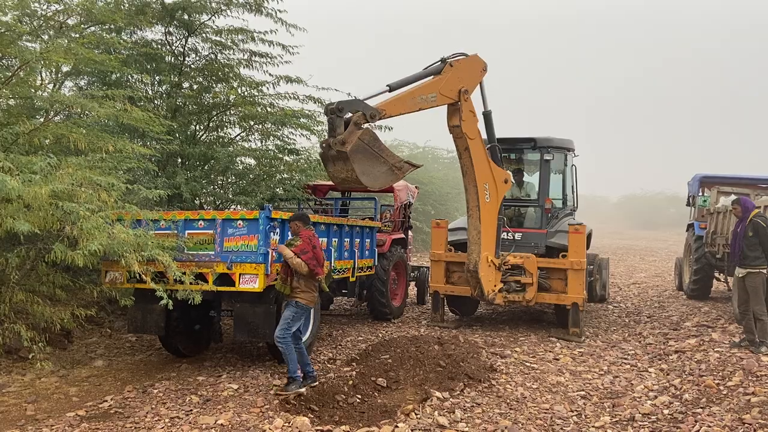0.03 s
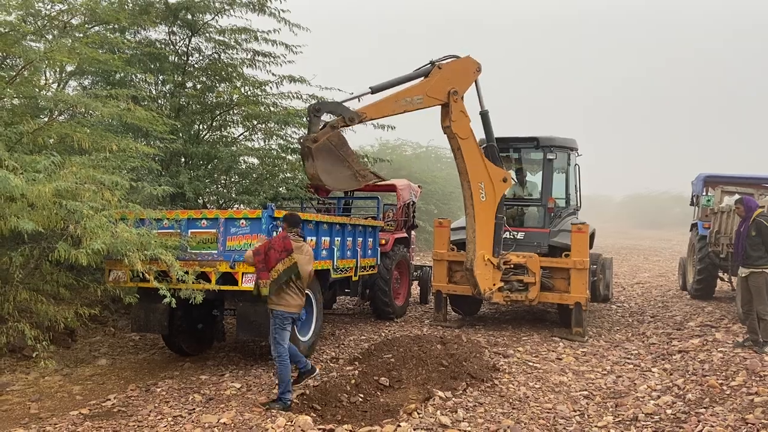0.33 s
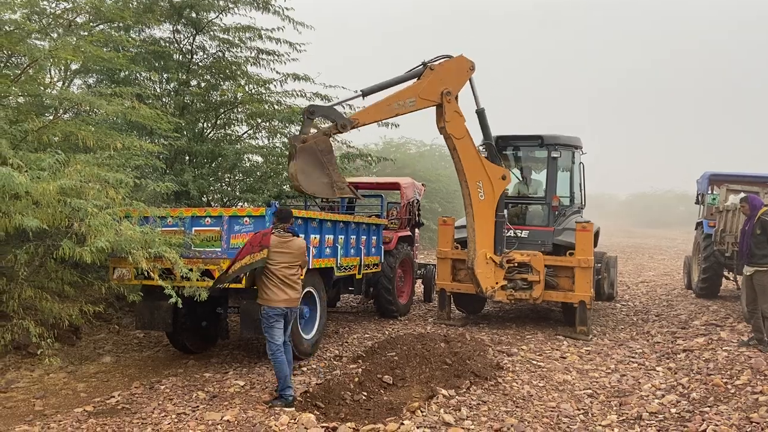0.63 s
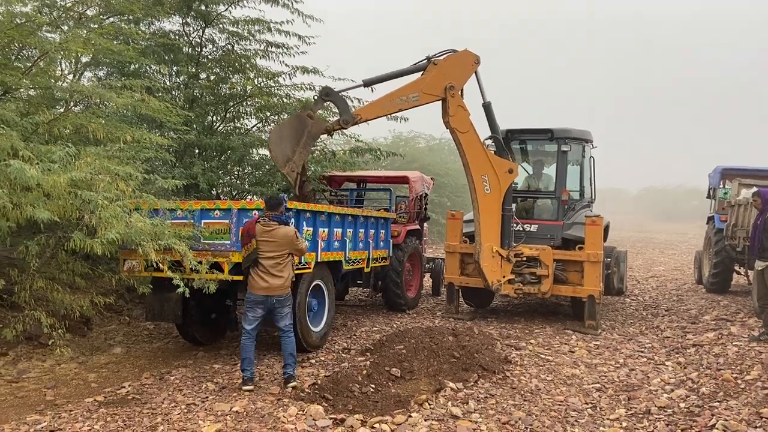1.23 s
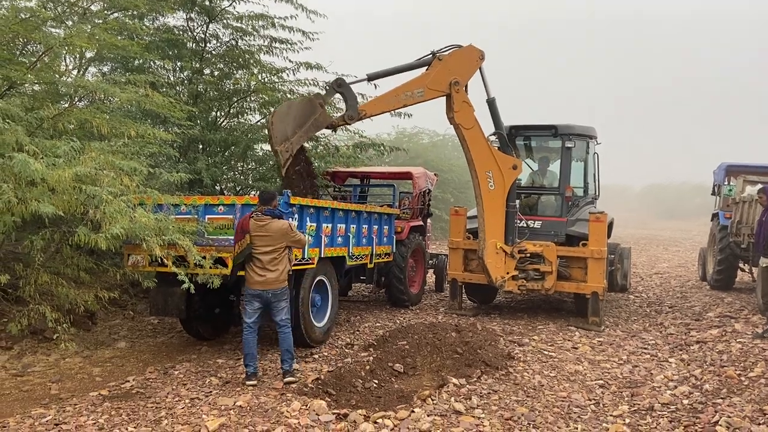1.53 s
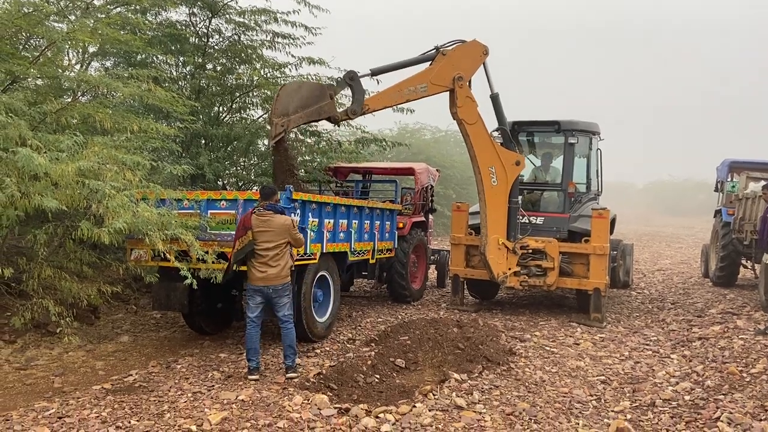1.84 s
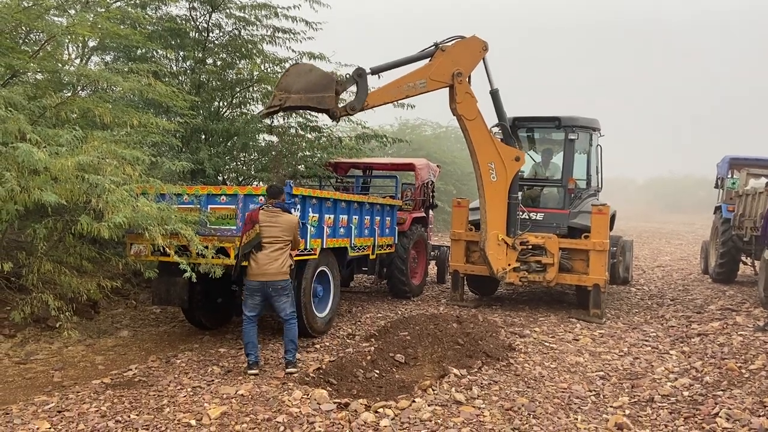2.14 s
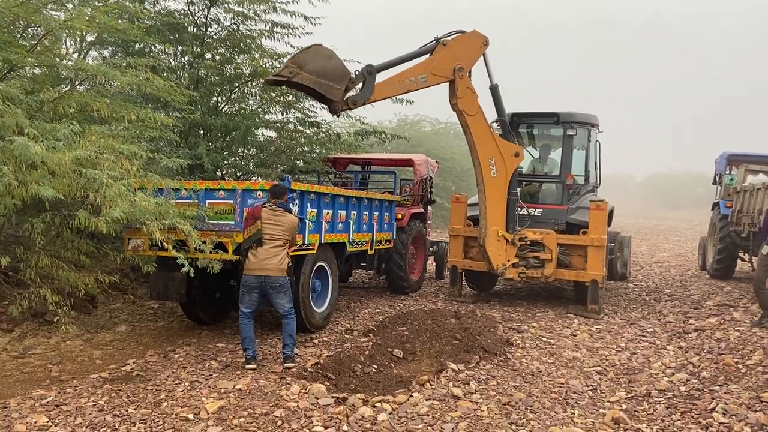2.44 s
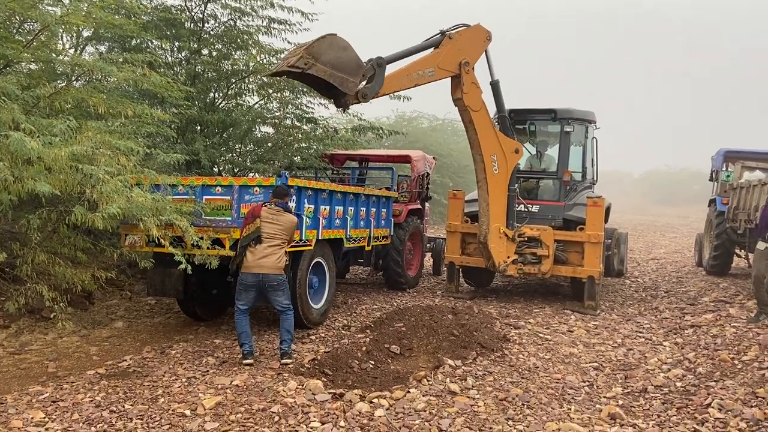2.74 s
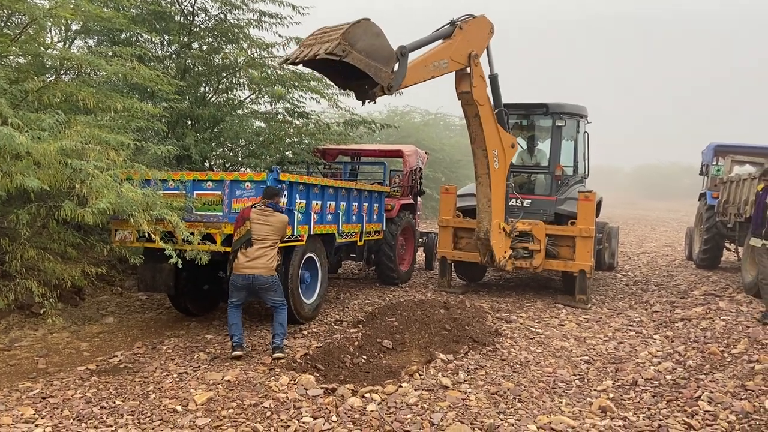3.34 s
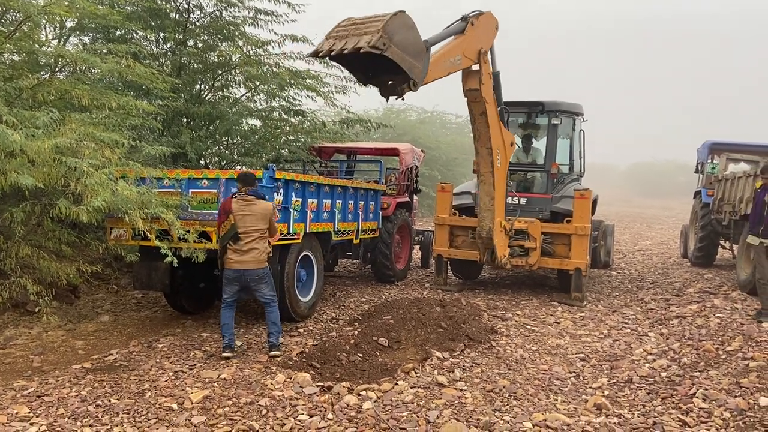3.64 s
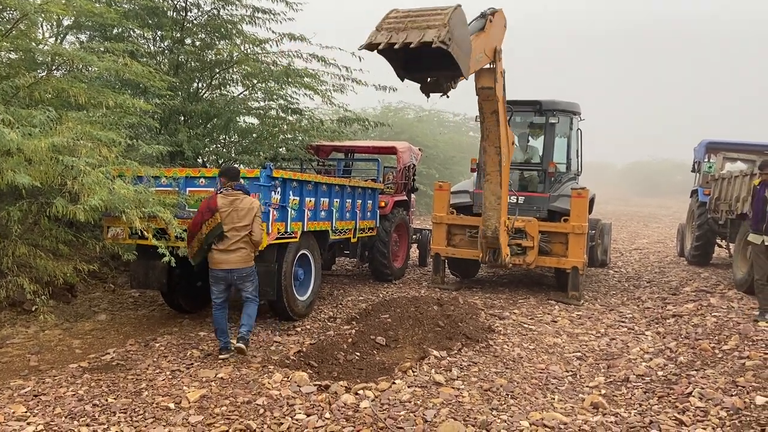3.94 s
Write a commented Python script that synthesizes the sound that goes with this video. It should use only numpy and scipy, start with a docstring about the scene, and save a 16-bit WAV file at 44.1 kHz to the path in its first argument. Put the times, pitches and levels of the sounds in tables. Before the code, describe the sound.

A load of stones and sliding earth clatters onto a ringing metal trailer bed outdoors. Some metres from the microphone, a backhoe rumbles throughout; its boom clunks, the load drops, then the boom knocks again and a little grit ticks.

```python
"""A diesel drones, with fan, pump whine and oil hiss: a backhoe at work some metres off on open ground.
Its boom clunks in slack pins, then the bucket tips soil and stones into a steel trailer. Clumps of
stones crash on the ringing bed in two waves over a stream of sliding earth, and heavy soil thumps the
chassis. The drone sinks in level during the crash, then comes back. A few stragglers drop, the boom
clunks again and grit ticks."""
import sys
import numpy as np
from scipy import signal
from scipy.fft import rfft, irfft, next_fast_len
from scipy.io import wavfile
from scipy.ndimage import map_coordinates

SR = 44100
rng = np.random.default_rng(int(sys.argv[2]) if len(sys.argv) > 2 else 0)


def store_wav(level_fs):
    """Save 16-bit WAV to argv[1]."""
    pcm = np.round(np.clip(np.atleast_2d(level_fs), -1, 1) * 32767)
    wavfile.write(sys.argv[1], SR, pcm.T.astype(np.int16))


N = 176400

# Levels are relative within a layer; a colour is the spectrum of a noise.
# the diesel's firing rate (t/s, f/Hz)
FIRING_RATE = [(0.1, 45.4), (.38, 46.2), (.52, 49), (.68, 46), (.82, 47), (.98, 45.6), (1.2, 44.8),
               (1.6, 45.7), (2.22, 43), (2.53, 45.8), (2.76, 44), (2.98, 45.7), (3.25, 46.9), (4, 47.6)]
# level of the drone, which sinks during the crash and comes back (t/s, level/dB)
DRONE_LEVEL = [(.1, 1), (.55, 1.5), (1.03, 1), (1.25, -10.5), (1.5, -7), (1.78, -2), (2.2, -3.5),
               (2.65, -1.5), (2.85, 0), (3.3, 0), (4, -0.5)]
# exhaust hum and pump whine (multiple of the firing rate, level/dB)
EXHAUST_TONES = [(1, -31), (1.5, -48.5), (2, -27), (2.5, -53.5), (4, -37.5), (5, -36)]
PUMP_TONES = [(15, -44), (20, -45.5), (26, -53.5), (30, -54.5)]
# dark engine rumble and hard midrange clatter (f/Hz, level/dB)
RUMBLE_COLOUR = [(25, -40), (45, 1), (70, -9.5), (130, 0.5), (200, -0.5), (300, -3), (400, -8.5),
                 (520, -15), (1000, -30), (3000, -80)]
CLATTER_COLOUR = [(200, -24), (480, -1), (650, 4.5), (950, 0.5), (1300, -6.5), (2000, -6.5), (2800, -16.5),
                  (4200, -18.5), (5500, -30.5), (8000, -44), (15000, -48)]
# oil hiss in the valves: its swells (t/s, level/dB) and its colour (f/Hz, level/dB)
HISS_LEVEL = [(.1, -58), (.27, -46), (.42, -45), (.6, -52.5), (1, -59), (2.2, -45), (2.52, -55),
              (2.63, -41), (2.95, -43), (3.4, -45), (4, -44.5)]
HISS_COLOUR = [(1500, -27), (4000, -0.5), (6200, -2), (7700, 2.5), (9500, 0.5), (11500, 2), (15500, -2.5)]
# clunks of boom and bucket (t/s, thud level/dB, knock level/dB, clink level/dB)
CLUNK_HITS = [(0.179, -27.5, -27.5, -61.5), (0.233, -13.5, -27, -44), (0.294, -33, -28.5, -51),
              (.562, -25.5, -24, -31), (.622, -26.5, -30, -58), (0.742, -27, -29, -40.5),
              (.762, -25.5, -48, -59), (0.808, -25, -23.5, -38.5), (.86, -31, -33, -42.5),
              (2.558, -32, -30, -36.5), (2.694, -25, -24.5, -38), (2.73, -42, -33, -42.5),
              (2.766, -43, -28.5, -44), (2.805, -24, -33, -53), (2.878, -17.5, -26.5, -52),
              (2.904, -24, -31, -43), (2.987, -24.5, -23, -35)]
# low, middle and top of a clunk (f/Hz, level/dB)
THUD_COLOUR = [(100, -21), (220, -0.5), (300, -1), (380, -5.5), (520, -13.5), (1200, -51)]
KNOCK_COLOUR = [(250, -16), (500, -5), (800, 6.5), (1050, -1), (1400, -7), (1900, -9), (2600, -24.5),
                (6000, -43)]
CLINK_COLOUR = [(1200, -25), (2100, -3), (2600, -2), (3600, -0.5), (4600, -11), (7000, -15), (15000, -35)]
# ring of the bucket and its linkage (f/Hz, level/dB, t60/s)
LINKAGE_MODES = [(320.6, -3.5, 0.12), (1714, -6, 0.22), (2435, 3, 0.059), (2546, -12, 0.16),
                 (2773, 3.5, 0.042), (3120, -5, 0.097), (3764, -1, 0.063)]
# stream of earth (t/s, bass level/dB, middle level/dB, treble level/dB)
EARTH_LEVELS = [(1.03, -49, -56, -49), (1.07, -50, -27, -27), (1.2, -24.5, -23.5, -30.5),
                (1.35, -26.5, -25.5, -38.5), (1.5, -22, -27, -36), (1.67, -31.5, -34.5, -41),
                (1.77, -31, -27, -32.5), (1.95, -27, -29, -34.5), (2.04, -24.5, -24.5, -34),
                (2.161, -33.5, -35, -43.5), (2.32, -46, -41, -43.5), (2.45, -63, -63, -68)]
# clumps of stones on the bed (t/s, clang level/dB, body level/dB, crack level/dB, spray level/dB)
STONE_HITS = [(1.042, -14, -24.5, -19, -18), (1.062, -15.5, -23, -23, -21), (1.11, -10.5, -22, -14, -19),
              (1.149, -16.5, -24, -19, -28), (1.186, -10.5, -22, -17.5, -29), (1.226, -28, -25, -25, -30),
              (1.263, -15, -22.5, -16.5, -34), (1.313, -18.5, -12.5, -32, -42),
              (1.382, -29, -19.5, -28.5, -40), (1.402, -30, -20.5, -25.5, -28.5),
              (1.463, -41, -29, -36, -40), (1.553, -22.5, -20.5, -30, -36), (1.579, -17.5, -35, -28.5, -42),
              (1.612, -35, -22.5, -33, -48), (1.725, -32, -35, -29.5, -30), (1.797, -12, -15.5, -21.5, -31),
              (1.819, -19.5, -33, -34, -31), (1.884, -17, -16, -27.5, -40), (1.931, -23, -27, -38, -25.5),
              (1.96, -21.5, -21, -42, -32), (1.993, -16.5, -15, -39, -16), (2.062, -21.5, -22.5, -21, -20),
              (2.219, -37, -44, -30.5, -24.5), (2.335, -38, -50, -33, -37), (2.446, -48, -52, -34, -35)]
# the falling load: booming body, steely clang, sharp crack, spray of fine gravel (f/Hz, level/dB)
BODY_COLOUR = [(60, -13), (120, -13), (220, 0), (315, 2.5), (430, -4.5), (620, -12), (1500, -41.5)]
CLANG_COLOUR = [(200, -15), (480, -6), (680, -0.5), (830, 3.5), (1100, -3.5), (1400, -6), (1700, -5),
                (2000, -10), (2500, -9.5), (3800, -15.5), (6000, -33.5), (15000, -44)]
CRACK_COLOUR = [(800, -28), (1900, -4), (2600, 1), (3900, 3.5), (5200, -1), (7000, -12), (9500, -7),
                (15500, -27)]
SPRAY_COLOUR = [(2000, -21), (4000, -1.5), (5800, 0), (7600, -1.5), (9500, -3), (12000, -8.5),
                (15500, -13.5)]
# ring of the steel bed (f/Hz, level/dB, t60/s)
BED_MODES = [(308, -2, 0.47), (442, -10, 0.27), (560.5, 1, 0.31), (626, -18, 0.53), (732, -17, 0.53),
             (821, 1.5, 0.4), (1136, 3.5, 0.16), (1290, -22, 0.3), (1730, -5, 0.27), (2100, 0.5, 0.14),
             (2330, 2.5, 0.11), (2410, 1, 0.18), (3150, 2.5, 0.083), (3828, -1, 0.17)]
# the bulk of the soil landing (t/s, level/dB) and its deep colour (f/Hz, level/dB)
SLUMP_HITS = [(1.585, -22), (1.8, -23), (1.89, -25)]
SLUMP_COLOUR = [(35, -25), (65, 0), (140, 1.5), (200, -2), (400, -37.5)]
# grit ticking nearby (t/s, level/dB) and its bright colour (f/Hz, level/dB)
GRIT_HITS = [(3.29, -34), (3.638, -36), (3.677, -38), (3.852, -37.5)]
GRIT_COLOUR = [(2000, -6), (5000, -3.5), (11000, 0), (15500, -4)]
# stereo width (f/Hz, side over mid level/dB) and lean (f/Hz, left over right level/dB)
STEREO_WIDTH = [(60, -20), (250, -17), (500, -13), (1100, -8.5), (2200, -6), (4200, -7.5), (5500, 1.5),
                (6600, -33), (14000, -33)]
STEREO_LEAN = [(60, -0.5), (330, -1.5), (700, 0.7), (3500, 2.5), (9000, 0)]


def amp(db):
    """Decibels to gain."""
    return 10 ** (np.asarray(db) / 20)


def along(points, hz):
    """Read (f/Hz, value) points at hz, on a log frequency axis."""
    freqs, values = np.transpose(points)
    return np.interp(np.log(hz + 1), np.log(freqs + 1), values)


def curves(rows):
    """One value per sample for each column after the time."""
    times, *columns = np.transpose(rows)
    return [np.interp(np.arange(N) / SR, times, column) for column in columns]


def wobble(per_s):
    """A smooth random curve with per_s knots a second."""
    knots = rng.standard_normal(int(N * per_s / SR) + 4)
    return map_coordinates(knots, [np.arange(N) * per_s / SR])


def filtered(x, response):
    """Equalise x with a gain given as a function of frequency."""
    size = next_fast_len(N + SR // 2)
    return irfft(rfft(x, size) * response(np.fft.rfftfreq(size, 1 / SR)), size)[..., :N]


def texture(colour, grains=1):
    """Coloured mid and side noise, mid at rms 1; sparse grains make it gritty."""
    def response(hz):
        return amp(along(colour, hz)) * np.array([np.ones_like(hz), amp(along(STEREO_WIDTH, hz))])
    pair = filtered(grains * rng.standard_normal((2, N)), response)
    return pair / np.std(pair[0])


def contacts(per_s, spread_db):
    """Random tiny contacts of uneven size."""
    return (rng.random(N) < per_s / SR) * amp(spread_db * np.clip(rng.standard_normal(N), -2, 2))


def bursts(times, levels_db, rise_s, fall_db_per_s):
    """Envelope of hits with a quick attack and a steady decay; overlaps add in power."""
    age = np.arange(SR // 2) / SR
    shape = np.minimum(age / rise_s, 1) * amp(-fall_db_per_s * np.maximum(age - rise_s, 0))
    power = np.zeros(N + SR)
    for start_s, db in zip(times, levels_db):
        power[round(start_s * SR):][:len(age)] += (amp(db) * shape) ** 2
    return np.sqrt(power[:N])


def ring(x, modes):
    """Send x through decaying modes, with a response of unit energy."""
    age = np.arange(SR // 2) / SR
    response = sum(amp(db - 60 * age / t60) / np.sqrt(t60) * np.cos(2 * np.pi * hz * age)
                   for hz, db, t60 in modes)
    return signal.fftconvolve(x, response[None] / np.linalg.norm(response), axes=1)[:, :N]


def diesel(fan_multiple=3.553):
    """Exhaust, fan and pump follow one shaft; rumble and clatter pulse with the firings."""
    firing_hz, = curves(FIRING_RATE)
    drone_db, = curves(DRONE_LEVEL)
    firing_phase = 2 * np.pi * np.cumsum(firing_hz) / SR

    def tone(multiple, db, flutter_db, drift_rad):
        gain = np.sqrt(2) * amp(db + flutter_db * wobble(16))
        phase = multiple * firing_phase + drift_rad * wobble(12) + rng.uniform(0, 2 * np.pi)
        return gain * np.sin(phase)

    exhaust = sum(tone(k, db, flutter_db=0.45, drift_rad=0.021) for k, db in EXHAUST_TONES)
    fan = tone(fan_multiple, db=-26.5, flutter_db=1.64, drift_rad=0.11)
    pump = sum(tone(k, db, flutter_db=1.5, drift_rad=0.22) for k, db in PUMP_TONES)
    tones = np.array([exhaust + fan + pump, np.zeros(N)])  # all mid, no side
    rumble = amp(-31.5 + 0.4 * wobble(5.9)) * texture(RUMBLE_COLOUR)
    rumble *= 1 + 0.44 * np.cos(firing_phase)
    clatter = amp(-37.5 + 0.8 * wobble(6.75)) * texture(CLATTER_COLOUR)
    clatter *= 1 + 0.083 * np.cos(firing_phase) + 0.071 * np.cos(firing_phase / 2)
    return amp(drone_db) * (tones + rumble + clatter)


def oil_hiss():
    """Oil hisses as the valves open."""
    level_db, = curves(HISS_LEVEL)
    return amp(level_db) * texture(HISS_COLOUR)


def boom_clunks():
    """Slack pins knock as the arm changes direction, and the linkage rings briefly."""
    times, *levels = np.transpose(CLUNK_HITS)
    knocks = sum(bursts(times, db, rise_s=0.0064, fall_db_per_s=300) * texture(colour)
                 for db, colour in zip(levels, (THUD_COLOUR, KNOCK_COLOUR, CLINK_COLOUR)))
    return amp(-2.5) * (knocks + amp(-12) * ring(knocks, LINKAGE_MODES))


def sliding_earth():
    """Earth pours as a stream of fine contacts, in three flickering bands."""
    bands = zip(curves(EARTH_LEVELS), (BODY_COLOUR, CLANG_COLOUR, SPRAY_COLOUR))
    return sum(amp(db + 1.17 * wobble(70)) * texture(colour, contacts(per_s=4000, spread_db=0.5))
               for db, colour in bands)


def stone_crashes():
    """Stones land in clumps of many contacts and throw up gravel; the low body dies away last."""
    times, clang_db, body_db, crack_db, spray_db = np.transpose(STONE_HITS)
    clang_env, crack_env, spray_env = (bursts(times, db, rise_s=0.008, fall_db_per_s=294)
                                       for db in (clang_db, crack_db, spray_db))
    clang = clang_env * texture(CLANG_COLOUR, contacts(per_s=5000, spread_db=1))
    body = bursts(times, body_db, rise_s=0.008, fall_db_per_s=175) * texture(BODY_COLOUR)
    crack = crack_env * texture(CRACK_COLOUR, contacts(per_s=7000, spread_db=1))
    clinks = pebbles(crack_env)
    spray = spray_env * texture(SPRAY_COLOUR, contacts(per_s=11000, spread_db=1))
    return clang + amp(-1.5) * body + amp(-2) * crack + amp(-3.5) * clinks + amp(-1) * spray


def pebbles(envelope, per_s=450, centre_hz=3900, spread_octaves=0.6, t60_s=0.037):
    """Single pebbles clink, each at its own pitch and pan, as hard as the envelope says."""
    when, pitch, size, pan = rng.random((int(per_s * N / SR), 4)).T
    start = (when * N).astype(int)
    hz = centre_hz * 2 ** (spread_octaves * np.sqrt(3) * (2 * pitch - 1))
    age = np.arange(SR // 16) / SR
    decay = amp(-60 * age / t60_s)
    shower_rms = np.sqrt(per_s * np.sum(decay ** 2) / SR / 2)
    strength = (0.5 + size) * envelope[start] / shower_rms
    mid = strength[:, None] * decay * np.sin(2 * np.pi * hz[:, None] * age)
    side = mid * (2 * pan[:, None] - 1)
    index = (start[:, None] + np.arange(len(age))).ravel()
    return np.array([np.bincount(index, part.ravel(), N)[:N] for part in (mid, side)])


def trailer_bed(impacts, panel_t60_s=0.17):
    """The struck steel bed rings in its main modes and in a dense wash of panel modes."""
    age = np.arange(SR // 2) / SR
    tail = rng.standard_normal((2, len(age))) * amp(-60 * age / panel_t60_s)
    wash = signal.fftconvolve(impacts, tail / np.linalg.norm(tail[0]), axes=1)[:, :N]
    return impacts + amp(-20.5) * ring(impacts, BED_MODES) + amp(-11.5) * wash


def soil_slumps():
    """Heavy masses of soil land softly and thump the chassis."""
    times, db = np.transpose(SLUMP_HITS)
    return bursts(times, db, rise_s=0.016, fall_db_per_s=140) * texture(SLUMP_COLOUR)


def grit_ticks():
    """A few small, bright ticks of gravel."""
    times, db = np.transpose(GRIT_HITS)
    envelope = bursts(times, db, rise_s=0.003, fall_db_per_s=550)
    return envelope * texture(GRIT_COLOUR, contacts(per_s=5500, spread_db=7))


def place(pair, left_db):
    """Mid and side to stereo, with the left channel left_db above the right."""
    mid, side = pair
    return np.array([mid + side, mid - side]) * amp([[left_db / 2], [-left_db / 2]])


def scene():
    """The backhoe stands ahead, the trailer a touch to the left."""
    backhoe = diesel() + oil_hiss() + boom_clunks()
    grit = grit_ticks()
    trailer = amp(-2.5) * trailer_bed(stone_crashes() + sliding_earth()) + soil_slumps()
    return place(backhoe + grit, left_db=-0.33) + place(trailer, left_db=0.3)


def microphone_ports(hz, lag_from_hz=7100, lag_s=0.000247):
    """The two ports differ slightly in colour, and the left one lags in the high treble."""
    lag_rad = 2 * np.pi * lag_s * np.maximum(hz - lag_from_hz, 0)
    split = np.array([[0.5], [-0.5]])
    return amp(split * along(STEREO_LEAN, hz)) * np.exp(-1j * split * lag_rad)


def record(dry, low_cut_hz=36, open_s=0.083, ceiling=0.9, top_hz=15950):
    """The microphone opens after an instant of silence, trims both extremes and rounds off peaks."""
    x = filtered(dry, lambda hz: microphone_ports(hz) * np.minimum(hz / low_cut_hz, 1) ** 3)
    x *= np.arange(N) / SR > open_s
    x /= (1 + np.abs(x / ceiling) ** 6) ** (1 / 6)  # soft clip
    return filtered(x, lambda hz: hz < top_hz)


dry = scene()
out = record(dry)
store_wav(out)
```